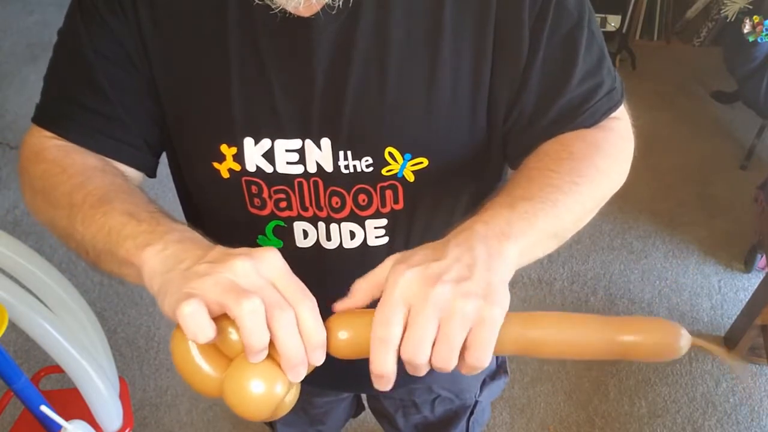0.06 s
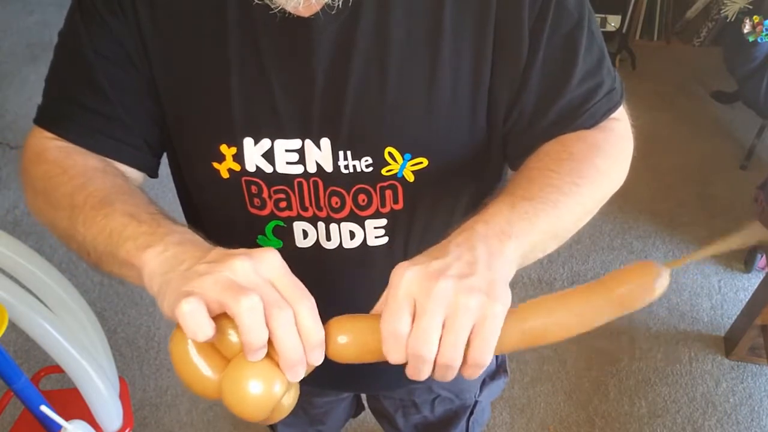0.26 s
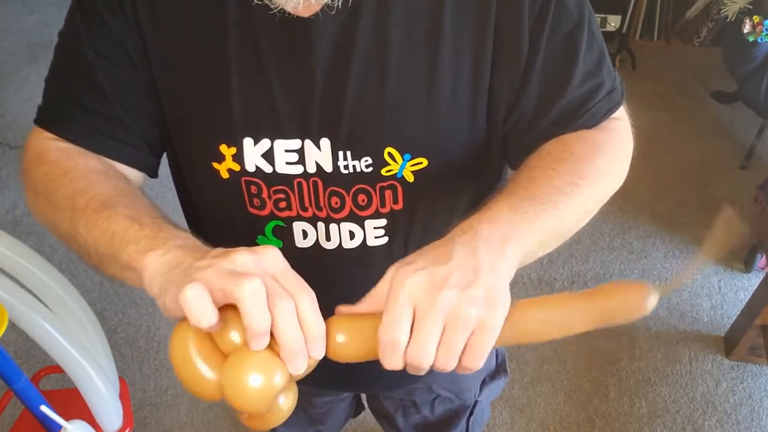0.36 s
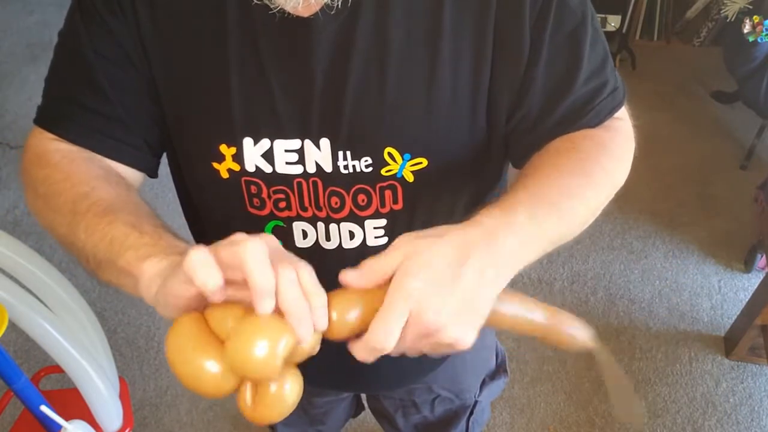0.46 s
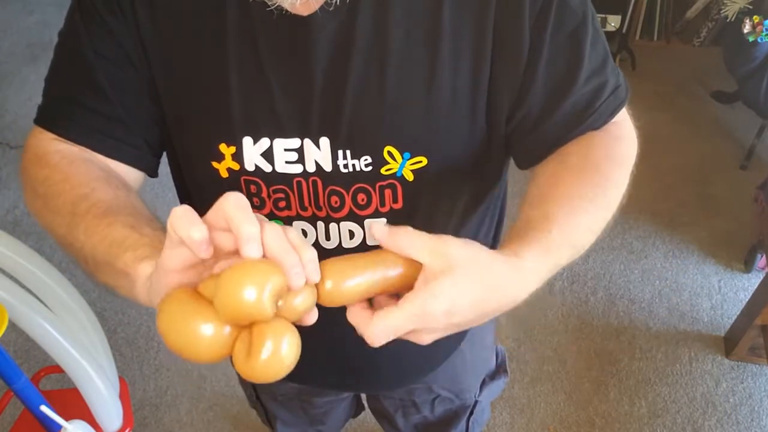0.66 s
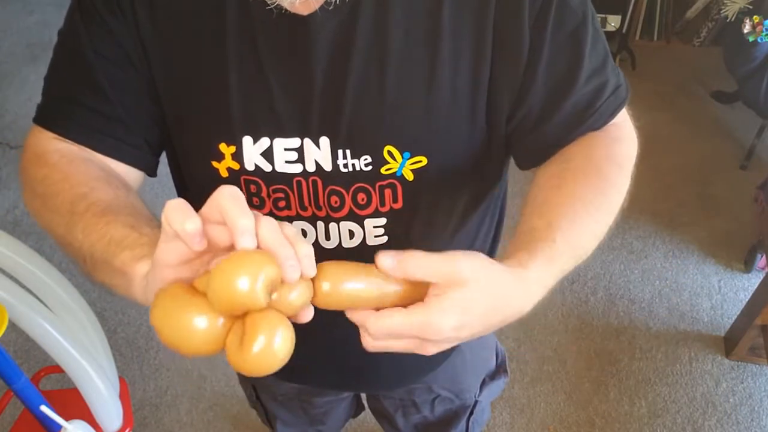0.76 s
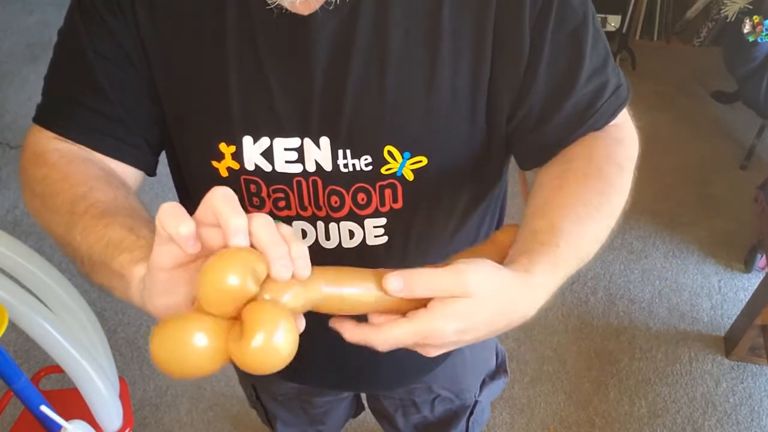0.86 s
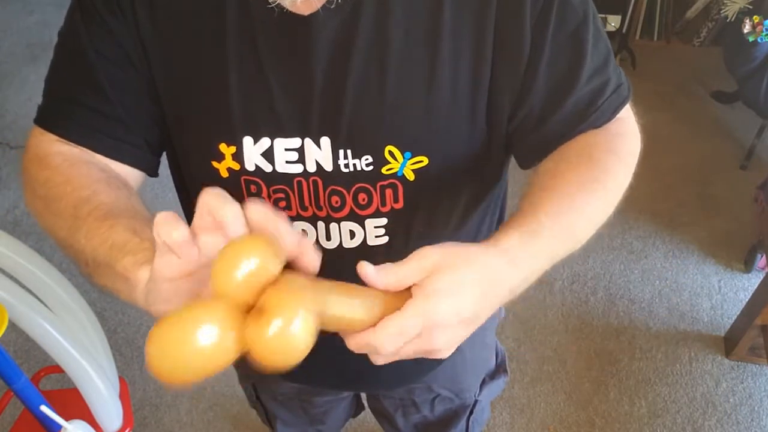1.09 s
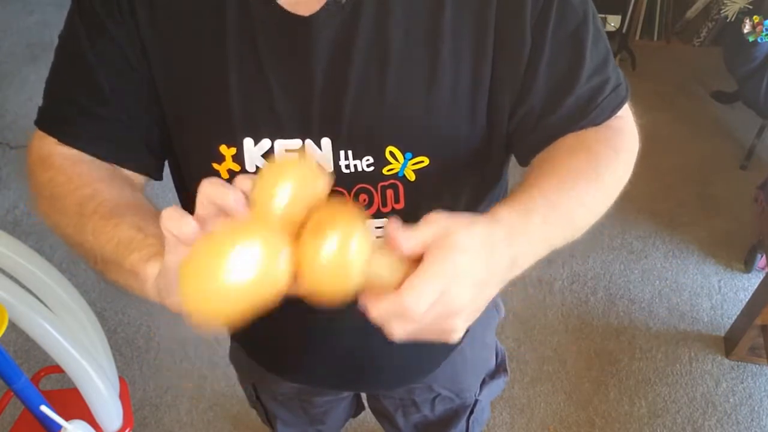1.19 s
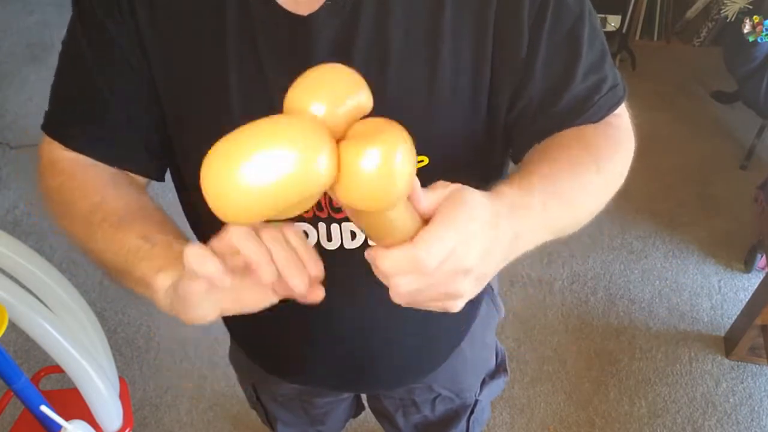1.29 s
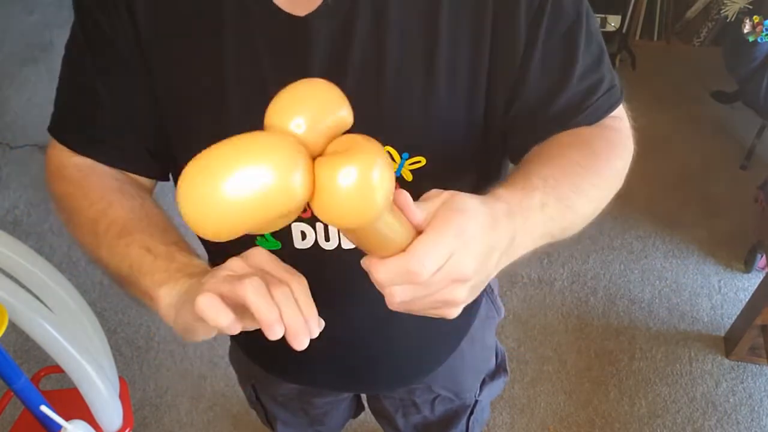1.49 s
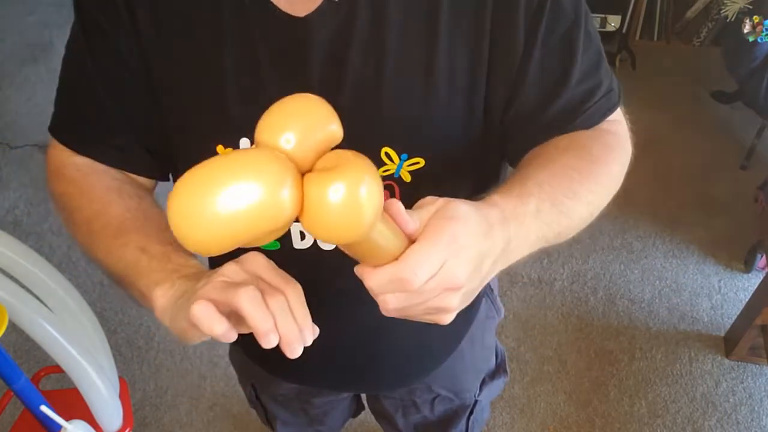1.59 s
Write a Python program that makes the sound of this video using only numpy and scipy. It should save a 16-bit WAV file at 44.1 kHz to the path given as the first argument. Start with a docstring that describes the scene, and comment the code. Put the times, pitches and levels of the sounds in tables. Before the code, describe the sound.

Close, dry balloon squeaks and rubbery rasping come in quick bursts with small snaps, ease off, then a hard pop-like click and hollow thump, followed by lighter squeaks and crisp ticks over faint room hum.

```python
"""In a small carpeted room, two hands twist a latex modelling balloon close to the microphone.
Rubber rubs on rubber: random tiny slips make the rasp, and trains of stick-slip clicks squeak and creak.
Single spikes are the skin's sharp snaps, and short dying tones the thumps of a lobe knocking on the others.
All these pulses but the rasp stir the skin and the hollow lobes, which ring as echoes and resonances.
Random reflections make the room; filtered noise and a steady tone make its low murmur and hum."""
import sys
import numpy as np
from scipy import signal
from scipy.fft import rfft, irfft
from scipy.io import wavfile

SR = 44100
rng = np.random.default_rng(int(sys.argv[2]) if len(sys.argv) > 2 else 0)


def wrap_up_sound(samples):
    """Save the sound to the file named by the first command line argument, as 16-bit audio."""
    columns = np.atleast_2d(samples).T
    # keep every value between -1 and 1, then stretch to whole-number steps
    tamed = np.clip(columns, -1, 1)
    steps = np.round(tamed * 32767).astype(np.int16)
    wavfile.write(sys.argv[1], SR, steps)


N = 72765
TIME = np.arange(N) / SR  # seconds


def from_db(db):
    """Decibels to gain."""
    return 10 ** (np.asarray(db) / 20)


def rms_one(x):
    """Scale to unit rms, the usual measure of average strength."""
    return x / np.sqrt(np.mean(x ** 2) + 1e-20)


def at_hz(points, size):
    """Read a (Hz, value) table at the frequency bins of a signal of this size."""
    hz, value = np.transpose(points)
    bins_hz = np.fft.rfftfreq(size, 1 / SR)
    return np.interp(np.log(bins_hz + 1), np.log(hz), value)


def colour(x, points):
    """Make some pitches stronger and others weaker, by a (Hz, dB) table."""
    length = x.shape[-1]
    size = length + 2048  # room for the filter to die away
    spectrum = rfft(x, size) * from_db(at_hz(points, size))
    return irfft(spectrum, size)[..., :length]


def stereo(pair):
    """Blend two unrelated signals into left and right, most alike in the bass and the top treble."""
    # How alike the two sides are. Each row: frequency in Hz, likeness (0 unrelated, 1 the same).
    likeness = [(30, .6), (100, .9), (300, .8), (700, .3), (2000, .05), (5500, .15), (9000, .7),
                (15000, .7)]
    size = pair.shape[-1]
    alike = np.clip(at_hz(likeness, size), -.99, .99)
    shares = np.sqrt([(1 + alike) / 2, (1 - alike) / 2])
    mid, side = irfft(rfft(pair) * shares, size)
    return np.array([mid + side, mid - side])


def contact(clicks, low_hz, high_hz):
    """Round ideal clicks into short pressure spikes by cutting the lowest and highest pitches."""
    top = signal.butter(3, np.clip(high_hz, 20, SR / 2 - 2000), fs=SR, output="sos")
    bottom = signal.butter(2, low_hz, "high", fs=SR, output="sos")
    return signal.sosfilt(np.vstack([top, bottom]), clicks + 1e-18)  # tiny offset keeps the filter fast


def add(out, s, sound):
    """Mix a sound in at time s, in seconds."""
    i = max(int(s * SR), 0)
    out[i:i + len(sound)] += sound[:max(N - i, 0)]


def slips(per_s, spread_db, spectrum):
    """Surfaces catch and slide: a stream of tiny random slips of uneven size, at unit rms."""
    uneven = np.minimum(rng.exponential(1, (2, N)), 4)
    sizes = from_db(spread_db * uneven) * rng.choice([-1, 1], (2, N))
    happens = rng.random((2, N)) < per_s / SR
    return rms_one(colour(stereo(sizes * happens), spectrum))


def rubbing():
    """Latex sliding on latex and skin: a fine bright rasp over coarser, duller slips and a low rumble."""
    # How the bright rasp swells and fades. Each row: time in seconds, level in dB before fine_db.
    fine_level = [(0.0, -51), (0.024, -53.5), (0.062, -42.5), (0.1, -49.5), (0.108, -46), (0.128, -57),
                  (0.158, -56.5), (0.258, -37.5), (0.274, -42.5), (0.35, -47), (0.37, -54.5), (0.388, -47),
                  (0.422, -54.5), (0.446, -43.5), (0.512, -36), (0.572, -47.5), (0.746, -47.5),
                  (0.768, -38.5), (0.818, -49.5), (0.826, -39.5), (0.93, -35.5), (0.99, -52), (1.032, -49),
                  (1.098, -69), (1.148, -44.5), (1.214, -63.5), (1.266, -40), (1.306, -57), (1.32, -45),
                  (1.328, -47), (1.34, -39), (1.352, -38.5), (1.37, -49.5), (1.5, -63.5)]
    # How the coarse slips swell and fade. Each row: time in seconds, level in dB before coarse_db.
    coarse_level = [(0,-49.5),(.08,-54.5),(.12,-60),(.17,-55.5),(.2,-42),(.26,-42.5),(.32,-58),(.37,-56),(.39,-42),(.425,-54.5),(.5,-43),(.56,-40),(.62,-55.5),(.73,-52.5),(.775,-42),(.812,-67),(.83,-36),(.89,-46),(.93,-29),(.975,-49),(1.09,-70),(1.14,-38.5),(1.18,-55.5),(1.26,-50.5),(1.3,-48),(1.337,-44.5),(1.342,-38.5),(1.38,-47),(1.5,-94)]
    # Tone colours of rasp, coarse slips and hands' rumble. Each row: frequency in Hz, strength in dB per Hz.
    fine_colour = [(200, -21.5), (1000, -3), (2300, 5), (4500, -1), (7000, -0.5), (8300, -5.5), (10000, 1),
                   (13000, 2.5), (16000, 3)]
    coarse_colour = [(80, -20), (170, -19), (280, -5.5), (600, 3.5), (1000, -3), (1500, -0.5), (2300, 1.5),
                     (3200, -4), (7000, -5), (15000, -36.5)]
    rumble_colour = [(40, -25.5), (80, -10), (115, 6.5), (170, -3), (260, 2), (400, 4), (900, -29)]
    fine_db, fine_per_s, fine_spread_db = 3, 9000, 5
    coarse_db, coarse_per_s, coarse_spread_db = 1.5, 1800, 1
    rumble_db, rumble_follows = -37, 0.46  # dB of rumble for each dB of coarse level

    fine_curve_db = np.interp(TIME, *np.transpose(fine_level))
    coarse_curve_db = np.interp(TIME, *np.transpose(coarse_level))
    fine = from_db(fine_curve_db + fine_db) * slips(fine_per_s, fine_spread_db, fine_colour)
    coarse = from_db(coarse_curve_db + coarse_db) * slips(coarse_per_s, coarse_spread_db, coarse_colour)
    rumble_gain = from_db(rumble_follows * coarse_curve_db + rumble_db)
    rumble = rumble_gain * slips(coarse_per_s, coarse_spread_db, rumble_colour)
    let_go = np.interp(TIME, [1.42, 1.52], [1, 0])
    return (fine + coarse + rumble) * let_go


def squeaks():
    """Gripping rubber lets go once per cycle: slow trains creak, fast ones squeak."""
    # Spells of grip and slip. Each row: start in seconds, length in seconds, first rate in Hz,
    # last rate in Hz, level in dB before the final mix, swell from start to end in dB, low edge in Hz,
    # high edge in Hz, unevenness of the time between slips (0 is regular).
    spells = [ (0.073, 0.095, 1604, 1552, -58.5, 2, 1300, 1980, 0.1),
              (0.156, 0.04, 231, 299, -49.5, 10, 219, 494, 0.13),
              (0.179, 0.011, 426, 376, -43, -6, 400, 1490, 0),
              (0.1984, 0.018, 783, 846, -35, 4, 590, 970, 0.16),
              (0.219, 0.046, 830, 880, -50, 0, 560, 1070, 0.2),
              (0.249, 0.024, 1018, 1004, -35.5, 2, 736, 3100, 0),
              (0.252, 0.075, 763, 518.4, -43, -4, 400, 900, 0.2),
              (0.274, 0.0703, 1013, 757.6, -42.5, 17, 600, 1050, .07),
              (0.29, 0.042, 525, 392, -40, 3, 850, 1210, 0),
              (0.335, 0.041, 786, 758, -48, 7, 440, 850, .24),
              (0.385, 0.045, 267.5, 261, -46, -6, 222, 850, .08),
              (0.442, 0.043, 744, 509, -44, -2, 458, 1310, 0.2),
              (0.483, 0.042, 424, 525, -38, 0.5, 1460, 3130, 0.1),
              (0.539, 0.042, 506, 652, -42.5, -1.5, 546, 1524, 0.23),
              (0.674, 0.094, 270.6, 370, -62.5, -9, 250, 400, 0.11),
              (0.76, 0.034, 376, 354, -44, 5, 300, 1200, 0.02),
              (0.8262, 0.023, 599, 363, -39.5, -12.5, 885, 2500, 0),
              (0.835, 0.046, 416, 476, -49.5, 1.5, 420, 700, 0.11),
              (0.895, 0.027, 1360, 1197, -35.5, 11.5, 1000, 1677, 0.16),
              (0.93, 0.0096, 1600, 1386, -31, -9, 1148, 2000, 0.2),
              (0.932, 0.031, 706.4, 493, -29, -11, 330, 900, .35),
              (1.1165, 0.0049, 324, 310, -49.5, 2, 690, 3500, .02),
              (1.1284, 0.023, 319.7, 621, -34, -3, 1350, 3520, 0),
              (1.150, 0.077, 1427, 1490, -47.5, -8, 1390, 2280, 0.21),
              (1.2212, 0.028, 251.8, 344, -37, 2, 1328, 2160, 0.17),
              (1.238, 0.032, 622, 583, -44.5, 24, 401.5, 696, .08),
              (1.2536, 0.013, 578, 565, -35.5, 16, 603, 3400, 0),
              (1.338, 0.018, 229, 348, -35, -4.5, 698, 2000, .1)]
    slip_spread_db = 1.5
    release_share = 0.11  # the last part of each spell, where it fades out
    out = np.zeros(N)
    chances = rng.standard_normal((len(spells), 200, 2))
    for spell, chance in zip(spells, chances):
        s, length, first_hz, last_hz, db, swell_db, low_hz, high_hz, jitter = spell
        clicks = np.zeros(int(length * SR) + SR // 100)
        t = 0
        for period_luck, strength in chance:
            if t >= length:
                break
            release = min(1, (length - t) / (release_share * length))
            click_db = swell_db * t / length + slip_spread_db * strength
            clicks[int(t * SR)] += release * from_db(click_db)
            rate_hz = first_hz + (last_hz - first_hz) * t / length
            t += np.exp(jitter * period_luck) / rate_hz
        train = contact(clicks, low_hz, high_hz)
        strength_of_train = np.sqrt(np.sum(train ** 2) / (length * SR))
        add(out, s, from_db(db) * train / strength_of_train)
    return out


def snaps():
    """Each snap of the skin is one sharp spike."""
    # Each row: start in seconds, peak in dB before the final mix, upper edge in Hz (higher is brighter).
    snap_list = [(0.042, -33, 5900), (0.073, -25, 3500), (0.1078, -22.5, 4580), (0.1805, -25, 4100),
                 (0.2001, -24, 3000), (0.216, -21.5, 6140), (0.2458, -17, 7200), (0.679, -24.5, 6700),
                 (0.8247, -39, 5000), (0.931, -11, 3870), (0.947, -16.5, 5950), (1.2209, -33, 3040),
                 (1.318, -16.5, 5970), (1.3209, -21.5, 6000), (1.3404, -17.5, 8130), (1.3401, -27, 7000),
                 (1.3547, -21, 7200)]
    low_hz = 505
    out = np.zeros(N)
    for s, db, high_hz in snap_list:
        spike = contact(signal.unit_impulse(2048), low_hz, high_hz)
        add(out, s, from_db(db) * spike / np.abs(spike).max())
    return out


def knocks():
    """A lobe jumps and knocks on its neighbours: each knock is a thud of a few cycles."""
    # Each row: start in seconds, level in dB before doubling and filtering, pitch of the thud in Hz.
    knock_list = [(0.383, -49, 248), (0.920, -22, 140), (0.9305, -21, 700), (0.9352, -15.5, 290),
                  (0.9395, -18.5, 620), (0.947, -13.5, 330), (1.339, -34.5, 190)]
    t60_cycles, rise_s = 2.75, 0.00042  # cycles to fall by 60 dB, time scale of the onset
    out = np.zeros(N)
    t = TIME[:SR // 2]
    for s, db, thud_hz in knock_list:
        fade = from_db(-60 * t * thud_hz / t60_cycles) * (1 - np.exp(-t / rise_s))
        thud = fade * np.cos(2 * np.pi * thud_hz * t)
        add(out, s, 2 * from_db(db) * contact(thud, thud_hz / 2, 2 * thud_hz))
    return out


def lobes(x):
    """The air in the inflated lobes rings at its own pitches, stirred by every pulse."""
    # Each row: pitch in Hz, gain at that pitch in dB before ring_db, time to fall by 60 dB in seconds.
    modes = [(94, -1, .2), (129, -9, 0.19), (213, -1.5, 0.13), (260.7, 6.5, 0.31), (300, 3.5, 0.047),
             (369.5, 2.5, 0.18), (489, 4, 0.19), (545, 1, 0.093), (632, 2, .2), (669, -4.5, 0.6),
             (790, 4.5, .17), (892, 1.5, 0.28), (1098, -0.5, .18), (1345, 2.5, .16)]
    ring_db = -2
    out = 0
    for hz, db, t60 in modes:
        r = from_db(-60 / (t60 * SR))  # what is left of the ringing after one sample
        gain = from_db(db + ring_db) * (1 - r * r) / 2
        feedback = [1, -2 * r * np.cos(2 * np.pi * hz / SR), r * r]
        out = out + gain * signal.lfilter([1, 0, -1], feedback, x + 1e-18)
    return out


def tail(t60, delay_s):
    """Dense stereo reflections that start after a delay and die away; about unit energy per side."""
    t = TIME[:SR // 2]
    fade = from_db(-60 * t / t60) * (t >= delay_s)
    reflections = stereo(rng.standard_normal((2, len(t)))) * fade
    return reflections / np.sqrt(np.sum(fade ** 2))


def skin(pulses):
    """The taut skin carries each pulse on as a very short scatter of echoes."""
    t60_s, delay_s, level_db = 0.042, 0.0003, -0.5  # level before the final mix
    return from_db(level_db) * signal.fftconvolve(pulses, tail(t60_s, delay_s))[:, :N]


def room(balloon):
    """The walls send the sound back as a short, coloured reverberation."""
    # Colour of the reflections. Each row: frequency in Hz, gain in dB.
    reflection_colour = [(50, -18), (130, 8.5), (300, 1), (600, -0.5), (2000, -2.5), (7000, -3.5),
                         (15000, -20)]
    t60_s, delay_s, level_db = 0.34, 0.012, -8.5
    response = colour(tail(t60_s, delay_s), reflection_colour)
    return from_db(level_db) * signal.fftconvolve(balloon, response, axes=1)[:, :N]


def background():
    """Low room tone from filtered noise, and a steady hum from one sine wave."""
    # Colour of the room tone. Each row: frequency in Hz, strength in dB per Hz.
    tone_colour = [(25, -23), (60, -0.5), (120, -11), (230, -4), (330, -10.5), (500, -27.5), (1500, -36.5),
                   (5000, -42.5), (15000, -36.5)]
    hum_hz, hum_db, tone_db = 123.5, -60, -62.5  # both levels are rms
    hum = np.sqrt(2) * from_db(hum_db) * np.sin(2 * np.pi * hum_hz * TIME)
    noise = stereo(rng.standard_normal((2, N)))
    return hum + from_db(tone_db) * rms_one(colour(noise, tone_colour))


def scene():
    """Pulses ring through the skin into the room, and through the lobes straight out, leaning to the right at
    most pitches."""
    # Balance of the two sides. Each row: frequency in Hz, left minus right in dB.
    lean = [(100, 5), (270, -2), (600, 0), (1500, -3), (3300, -3.5), (5500, -10), (9000, -4), (15000, 2)]
    pulses = (squeaks() + snaps() + knocks())[None]
    balloon = from_db(-3.5) * (pulses + skin(pulses)) + rubbing()
    left, right = balloon + lobes(pulses) + room(balloon)
    # each side takes half of the difference
    left = colour(left, [(hz, db / 2) for hz, db in lean])
    right = colour(right, [(hz, -db / 2) for hz, db in lean])
    return np.array([left, right]) + background()


def record(dry):
    """Cut the top of the treble steeply."""
    cutoff_hz = 15950
    steep = signal.ellip(12, .1, 80, cutoff_hz, fs=SR, output="sos")
    return signal.sosfilt(steep, dry)


dry = scene()
out = record(dry)
wrap_up_sound(out)
```